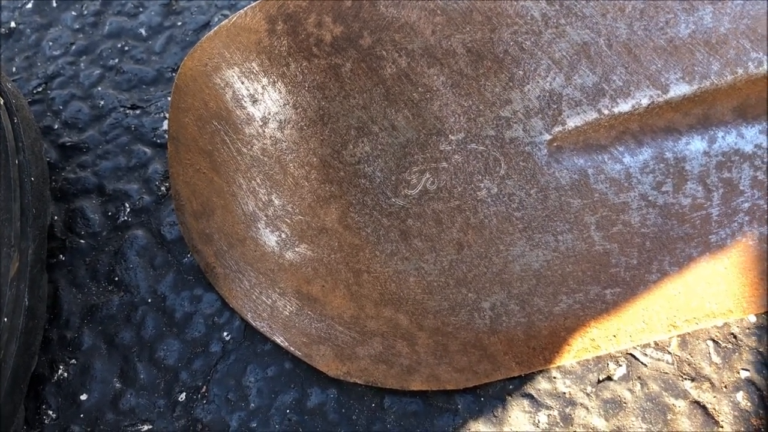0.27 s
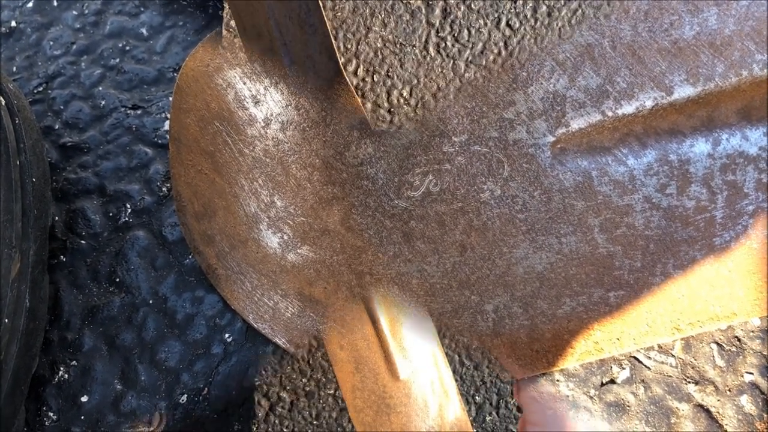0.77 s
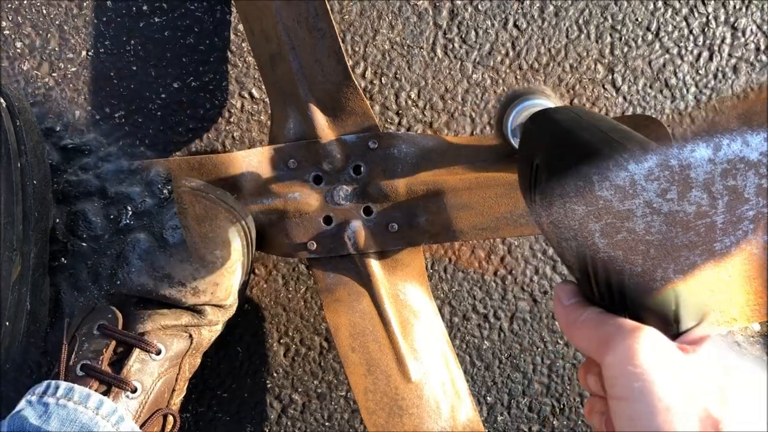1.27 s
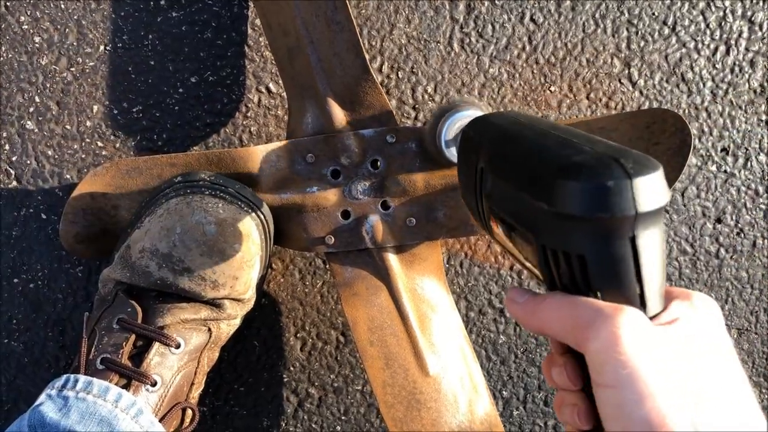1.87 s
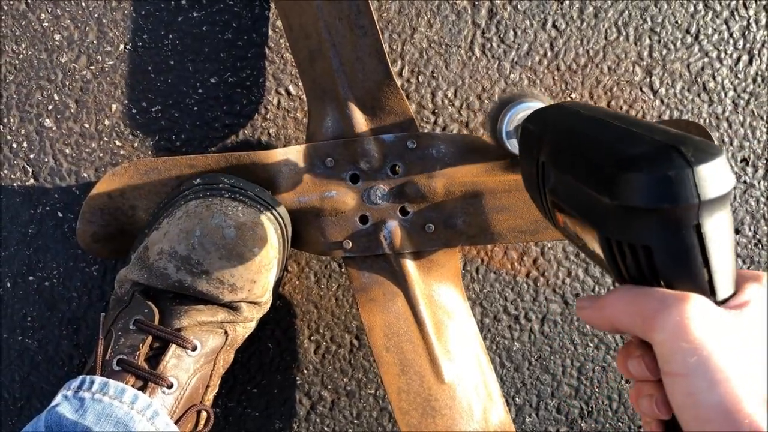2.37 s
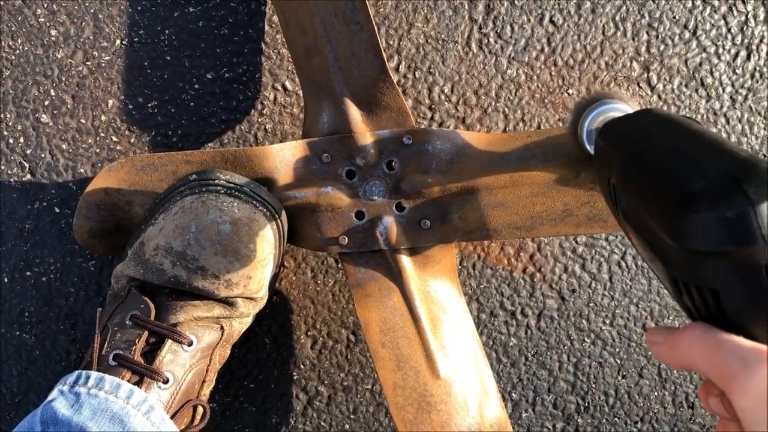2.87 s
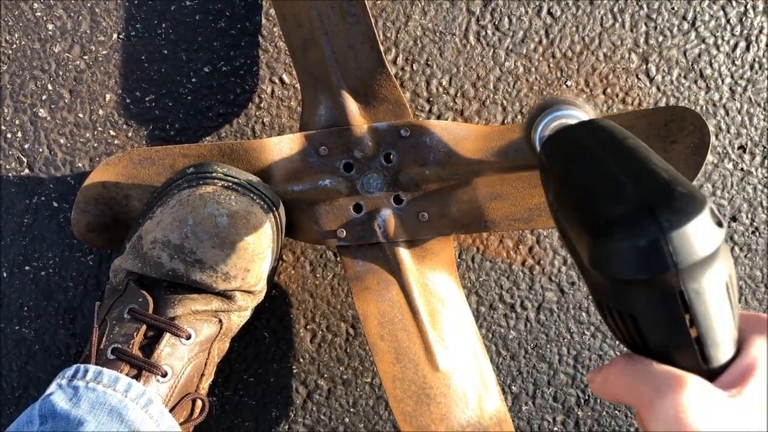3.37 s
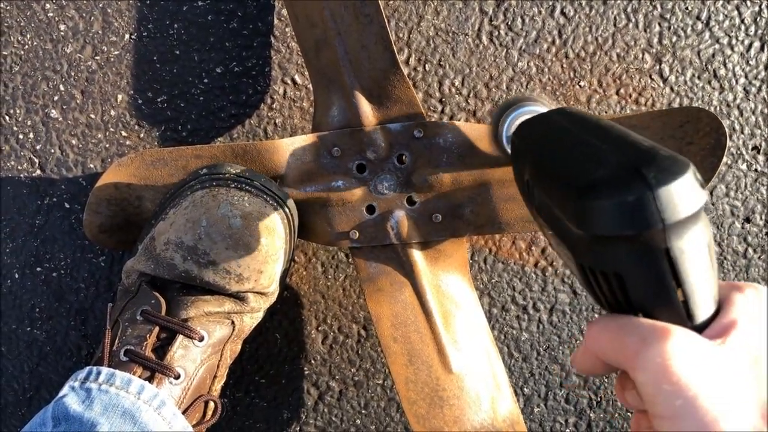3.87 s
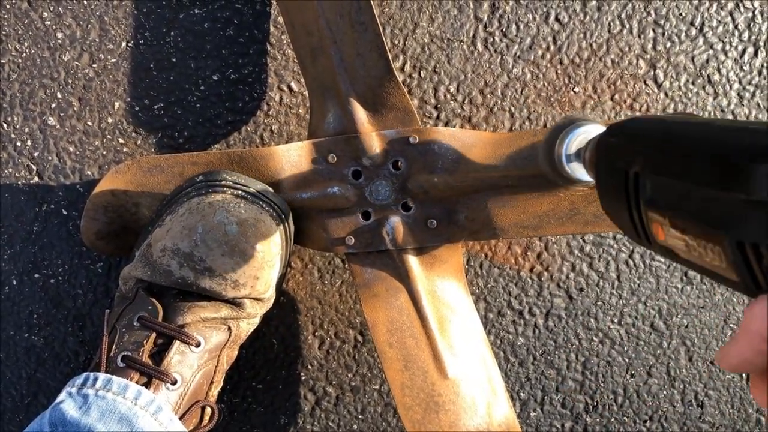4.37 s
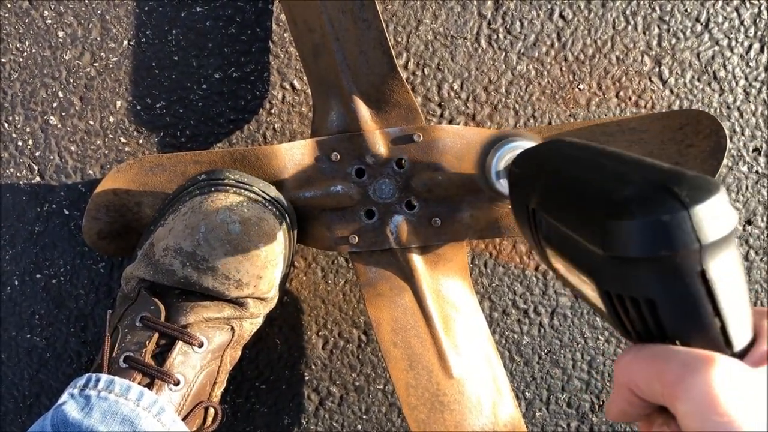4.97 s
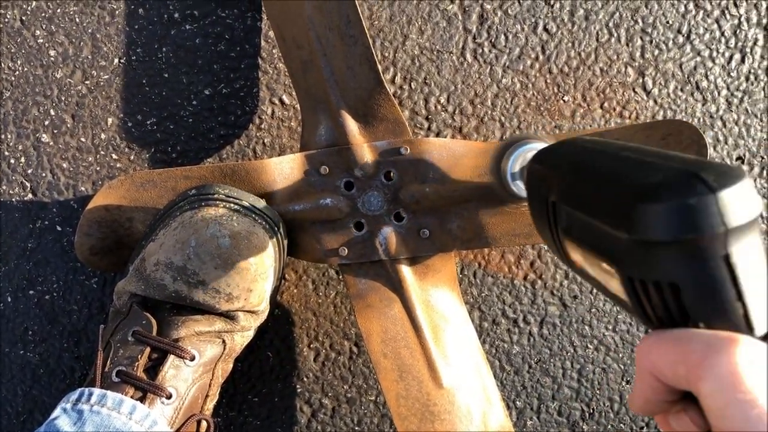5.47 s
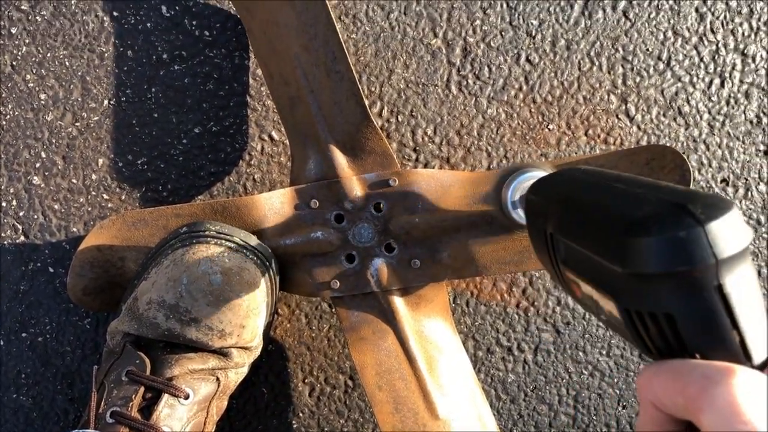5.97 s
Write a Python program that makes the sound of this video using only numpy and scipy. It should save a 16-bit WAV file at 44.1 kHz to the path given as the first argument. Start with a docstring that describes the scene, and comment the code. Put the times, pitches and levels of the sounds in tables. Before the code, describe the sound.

A wire wheel on a whining electric drill hisses and scrapes over a steel fan blade, throbbing fast and growing steadily louder from near silence.

```python
"""Outdoors, a low rumble grows a little and stops after two seconds; meanwhile an electric drill fades in.
Its motor runs up quickly, a stack of steady tones, and whines through its gears at their tooth rate.
The drill scrubs rust off a steel fan blade with a wire wheel: wire tips hit at random, hiss and ring the steel.
The wheel runs slightly out of true, so scrape and whine throb with every turn of the chuck.
Short squeals come and go; later the wrist rolls the drill side-on, and cooling air puffs on the microphone."""
import sys
import numpy as np
from scipy import signal
from scipy.fft import rfft, irfft, next_fast_len
from scipy.io import wavfile

SR = 44100
rng = np.random.default_rng(int(sys.argv[2]) if len(sys.argv) > 2 else 0)


def file_out(sig):
    """Save sig as 16-bit WAV at sys.argv[1]."""
    # one column per channel
    cols = np.atleast_2d(sig).T
    # limit, then scale
    lim = np.clip(cols, -1, 1)
    pcm = np.round(lim * 32767).astype(np.int16)
    wavfile.write(sys.argv[1], SR, pcm)


N = 273861   # length in samples
MAINS_HZ = 60


def from_db(db):
    """Turn decibels into a gain."""
    return 10 ** (np.asarray(db) / 20)


def rms_one(x):
    """Scale a sound to an average (rms) level of 1."""
    return x / np.sqrt(np.mean(x ** 2) + 1e-20)


def seconds():
    """The time of every sample."""
    return np.arange(N) / SR


def in_time(rows):
    """Each column of a table whose first column is time, joined by straight lines, sample by sample."""
    s, *columns = np.transpose(rows)
    return [np.interp(seconds(), s, column) for column in columns]


def wave(turns):
    """A smooth wave that repeats with every whole turn."""
    return np.cos(2 * np.pi * turns)


def mains_wave():
    """The current pulses twice in every mains cycle."""
    return wave(2 * MAINS_HZ * seconds())


def drift(rate):
    """Smooth random wandering of spread 1 that changes about rate times a second."""
    step = 40   # drawn at every 40th sample, then joined up
    memory = np.exp(-2 * np.pi * rate * step / SR)
    noise = rng.standard_normal(N // step + 2002)
    slow = signal.lfilter([1], [1, -2 * memory, memory ** 2], noise)[2000:]   # skip the settling
    return np.interp(np.arange(N) / step, np.arange(len(slow)), rms_one(slow))


def coloured(x, spectrum):
    """Give x a smooth spectrum."""
    hz, level_db = np.transpose(spectrum)
    size = next_fast_len(N)
    bins_hz = np.maximum(np.arange(size // 2 + 1) * SR / size, 1)
    gain = from_db(np.interp(np.log(bins_hz), np.log(hz), level_db))
    return irfft(rfft(x, size) * gain, size)[:N]


def resonance(x, hz, width_hz):
    """One resonance with gain 1 on top."""
    return signal.lfilter(*signal.iirpeak(hz, hz / width_hz, fs=SR), x)


def ramp(start_s, length_s):
    """A straight rise from 0 to 1."""
    return np.clip((seconds() - start_s) / length_s, 0, 1)


def swells(rows):
    """Gain of smooth swells, each rising to its peak and falling back within its length."""
    total = 0
    for peak_s, length_s, level_db in rows:
        place = np.clip((seconds() - peak_s) / length_s, -.5, .5)
        total = total + from_db(level_db) * np.cos(np.pi * place) ** 2
    return total


# colour of the outdoor rumble: (frequency [Hz], level [dB per Hz])
RUMBLE_COLOUR = [(18, -36), (30, -19), (53, -2), (119, -4.5), (260, -4.5), (288, -4.5), (320, -12),
                 (497, -14), (612, -14), (859, -9), (928, -14), (1090, -18), (1780, -20.5), (3680, -46),
                 (15000, -55)]
RUMBLE_START_DB, RUMBLE_RISE_DB_PER_S, RUMBLE_OUT_S = -45.2, 1.2, 1.905


def outdoors():
    """Rumble: low noise that grows slowly, then stops."""
    noise = rms_one(coloured(rng.standard_normal(N), RUMBLE_COLOUR))
    level_db = RUMBLE_START_DB + RUMBLE_RISE_DB_PER_S * seconds() + .8 * drift(5)
    stop = np.clip((RUMBLE_OUT_S - seconds()) / .015, 0, 1)
    return noise * from_db(level_db) * stop


DRILL_IN_S = .455
FADE_IN_S, FADE_FROM_DB = 5.0, -40


def fade_in():
    """Gain of the drill: it cuts in faintly, then rises in a straight line."""
    return (seconds() > DRILL_IN_S) * np.maximum(ramp(DRILL_IN_S, FADE_IN_S), from_db(FADE_FROM_DB))


# working speed of the motor, sagging a little under hand pressure: (time [s], rotor speed [turns per s])
WORKING_SPEED = [(1.3, 473.3), (1.9, 475.7), (2.75, 472.3), (3.25, 473.2), (3.6, 470.5), (4.25, 470.9),
                 (4.95, 475.5), (5.3, 473.6), (6.21, 475)]
RUN_UP_HZ, RUN_UP_S = 51, .185   # starts this far below speed; time constant of catching up


def rotor_speed():
    """The motor runs up quickly to its working speed; turns per s."""
    working_speed, = in_time(WORKING_SPEED)
    since_start = np.maximum(seconds() - DRILL_IN_S, 0)
    return working_speed - RUN_UP_HZ * np.exp(-since_start / RUN_UP_S)


def side_on():
    """How far the wrist has rolled the drill onto its side, 0-1."""
    return ramp(start_s=3.9, length_s=.55)


# motor and gear tones:
# (multiple of rotor speed, level [dB against the motor level], change when side-on [dB])
MOTOR_TONES = [(1, -26.5, -7), (2, -28, 3), (3, -26, 2), (4, -27, 4), (5.92, -27, 0), (6, -26, 2),
               (8, -27, 3), (9, -28, 3), (10, -26, 8), (12, -28, 2), (14, -26, 3), (15, -31, 0),
               (16, -33, 0), (19, -33, 0), (20, -22, 2), (22, -29, 0), (23, -33, 0), (26, -29, 0),
               (27, -33, 0), (28, -32, 0), (30, -29, 0)]
MOTOR_DB = -16.0


def motor(rotor):
    """Tones at multiples of the rotor speed, each a little unsteady, pulsing with the mains current."""
    turned = side_on()
    tones = 0
    for multiple, level_db, turned_db in MOTOR_TONES:
        tone = np.sqrt(2) * wave(multiple * rotor + rng.random() + .04 * drift(20))
        tones = tones + tone * from_db(level_db + turned_db * turned + 2.0 * drift(10))
    return tones * from_db(MOTOR_DB + 1.8 * mains_wave())


# loudness of the gears, before the drill's fade-in: (time [s], tooth tone level [dB], high whine level [dB])
GEAR_LEVELS = [(.5, -29.5, -27.8), (1.2, -26.4, -23.9), (2.1, -25.2, -25.2), (2.8, -25.8, -21.7),
               (3.15, -37, -24.6), (3.5, -37, -27), (3.56, -26.5, -32.5), (4.15, -27.5, -22.2),
               (4.5, -27, -20.8), (4.68, -32, -24), (4.97, -27, -26.6), (5.35, -31, -21.8),
               (5.7, -29.6, -24.6), (6.21, -30.5, -24.0)]
PINION_TEETH, GEAR_RATIO, IDLER_RATIO = 7, 23.78, 39 / 7   # ratios: rotor turns per turn of chuck, idler
THROB_DB, THROB_SIDE_ON_DB = 4.9, -1.5   # base swing per wheel turn, scaled for each tone; its change side-on


def gear_whine(rotor, chuck):
    """The pinion's tooth rate and its third harmonic swell as the wheel loads the gears."""
    mesh_db, whine_db = in_time(GEAR_LEVELS)
    depth_db = THROB_DB + THROB_SIDE_ON_DB * side_on()
    load_db = depth_db * wave(chuck) - depth_db ** 2 / 18   # a deeper throb is lowered overall
    idler = wave(rotor / IDLER_RATIO)   # the middle gear is a little eccentric too
    teeth = PINION_TEETH * rotor + .015 * drift(50)   # play between the teeth
    mesh_swing_db = 1.34 * load_db + 2.2 * idler + 1.0 * drift(30)
    whine_swing_db = .8 * load_db + .9 * idler + .9 * mains_wave() + 1.0 * drift(40)
    mesh = rms_one(wave(teeth) * from_db(mesh_swing_db))
    whine = rms_one(wave(3 * teeth) * from_db(whine_swing_db))
    return mesh * from_db(mesh_db) + whine * from_db(whine_db)


def wire_strikes(per_s, spread_db):
    """Wire tips hit the steel at random, most lightly, a few hard."""
    sizes = from_db(spread_db * np.minimum(rng.exponential(1, N), 7))
    hits = rng.random(N) < per_s / SR
    return rms_one(hits * sizes * rng.choice([-1, 1], N))


# ringing of the steel blade, damped by a boot: (frequency [Hz], width of each of two passes [Hz], level [dB])
BLADE_RINGING = [(693, 240, -9.5), (1045, 154, -1), (1138, 200, -1.5), (1439, 218, -1), (1586, 200, -5.5),
                 (1827, 197, -3), (2014, 178, -3)]
# contact of wheel and blade, before the fade-in:
# (time [s], level of the ring [dB], tilt towards its upper modes [dB])
WHEEL_CONTACT = [(.6, -18.2, -2.6), (1.05, -18.0, -1.2), (1.45, -20.2, 0), (1.95, -17.6, -.8),
                 (2.4, -18.6, -2.4), (3.4, -18.2, 2.8), (3.95, -17.6, -.4), (4.2, -19.4, 1.2),
                 (4.7, -17.8, 2.6), (5.15, -18.5, 1.5), (5.75, -17.3, 1.0), (6.21, -18.1, 1.4)]
MIDDLE_DB, MIDDLE_SIDE_ON_DB = .9, -1.0   # middle modes; they are fed less by a wheel on its side
MIDDLE_GIVES = .7   # the middle modes lose this share of what the upper ones gain


def blade(strikes, chuck):
    """The strikes ring the blade's broad modes, harder once per turn of the wheel."""
    ring_db, upper_db = in_time(WHEEL_CONTACT)
    middle_db = MIDDLE_DB - MIDDLE_GIVES * upper_db + MIDDLE_SIDE_ON_DB * side_on()
    ring = 0
    for hz, width_hz, level_db in BLADE_RINGING:
        # each strike lands elsewhere and so feeds each mode differently
        drive = strikes * rng.standard_normal(N)
        mode = resonance(resonance(drive, hz, width_hz), hz, width_hz)
        if hz > 1700:
            place_db = upper_db
        elif hz > 1300:
            place_db = middle_db
        else:
            place_db = 0
        ring = ring + mode * from_db(level_db + place_db + .6 * drift(7))
    bounce_db = (.3 + .6 * side_on()) * wave(chuck + .37)   # a tilted wheel bounces more
    return rms_one(ring) * from_db(ring_db + bounce_db)


# colour of the wire hiss: (frequency [Hz], level [dB per Hz])
HISS_COLOUR = [(100, -22), (250, -14), (450, -7), (900, -6.5), (1600, -6.5), (2300, 0.5), (3000, 0),
               (5500, 0), (8000, -1.5), (10000, 0.5), (13000, -2.6), (15600, -3.3)]
# colour added by wheel and drill housing: (frequency [Hz], width [Hz], boost [dB])
WHEEL_COLOUR = [(2250, 150, -2.5), (2870, 120, 0.5), (3360, 300, 3.5), (3730, 190, 2), (4790, 390, 3),
                (6560, 380, 2), (14570, 200, 4.5), (15480, 350, 5.5)]


def hiss(strikes, rotor, chuck):
    """Bright scratching of the wires, fluttering with wheel, rotor and mains."""
    flutter_db = .63 * wave(chuck) + .8 * wave(rotor) + .12 * mains_wave() + .32 * drift(25)
    x = coloured(strikes * from_db(flutter_db), HISS_COLOUR)
    for hz, width_hz, boost_db in WHEEL_COLOUR:
        extra = from_db(boost_db + 1.0 * drift(6.4)) - 1
        x = x + extra * resonance(x, hz, width_hz)
    return rms_one(x)


# the wires catch an edge and one mode of the steel squeals:
# (time of peak [s], length [s], level [dB against the hiss])
EDGE_SQUEALS = [(.96, .16, -10), (1.3, .3, -15), (1.57, .2, -12.5), (2.93, .2, -9.5), (3.42, .16, -16),
                (4.28, .2, -11), (4.61, .24, -11.5), (5.3, .3, -18)]
EDGE_HZ, EDGE_DB = 3467, -23   # pitch of the squeal; its level between squeals, against the hiss


def singing_edge():
    """One narrow mode of the steel as a single tone, fed unevenly by the wires so that it wavers."""
    tone = wave(EDGE_HZ * seconds() + .16 * drift(12)) * from_db(2.5 * drift(25))
    return rms_one(tone) * np.maximum(from_db(EDGE_DB), swells(EDGE_SQUEALS))


# colour of the moving air: (frequency [Hz], level [dB per Hz])
AIR_COLOUR = [(20, -38), (40, -9), (65, 1), (105, -3), (170, -3), (260, -11), (400, -16), (1500, -50)]
# puffs of cooling air on the microphone, before the fade-in: (time of peak [s], length [s], level [dB])
AIR_PUFFS = [(3.25, .6, -61), (4.7, .16, -49), (5.3, .1, -54), (5.66, .16, -46), (5.78, .2, -53)]
FLOW_DB, FLOW_SIDE_ON_DB = -52, -2.5   # steady flow; its change when the drill is side-on


def draught():
    """Lumpy low noise of moving air: a steady flow and a few puffs."""
    flow = from_db(FLOW_DB + FLOW_SIDE_ON_DB * side_on()) + swells(AIR_PUFFS)
    air = rms_one(coloured(rng.standard_normal(N), AIR_COLOUR))
    return air * flow * from_db(1.1 * drift(8))


HISS_DB, HISS_SIDE_ON_DB = -14.7, 1.0   # wires, before the fade-in; their change when side-on


def scene():
    """The drill and its scrubbing fade in over the rumble."""
    rotor = np.cumsum(rotor_speed()) / SR   # turns so far
    chuck = rotor / GEAR_RATIO + .71
    rotor = rotor + .0024 * wave(chuck + .23)   # the uneven load rocks the motor's speed
    strikes = wire_strikes(per_s=26000, spread_db=2.55)
    wires_gain = from_db(HISS_DB + HISS_SIDE_ON_DB * side_on())
    wires = wires_gain * (hiss(strikes, rotor, chuck) + singing_edge())
    work = motor(rotor) + gear_whine(rotor, chuck) + blade(strikes, chuck) + wires + draught()
    mono = outdoors() + fade_in() * work
    return np.array([mono, mono])


def record(dry):
    """One microphone on both channels: deep bass is rolled off, rare peaks are clipped, the top is cut steeply."""
    thin = signal.sosfilt(signal.butter(4, 38, "high", fs=SR, output="sos"), dry)
    clipped = np.clip(thin, -.8, .8)
    return signal.sosfilt(signal.ellip(14, .1, 90, 15750, fs=SR, output="sos"), clipped)


dry = scene()
out = record(dry)
file_out(out)
```